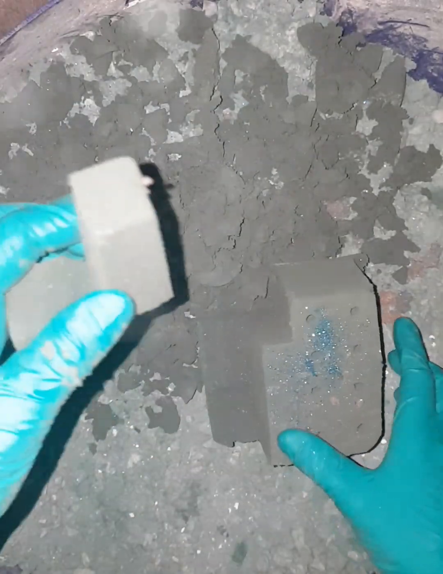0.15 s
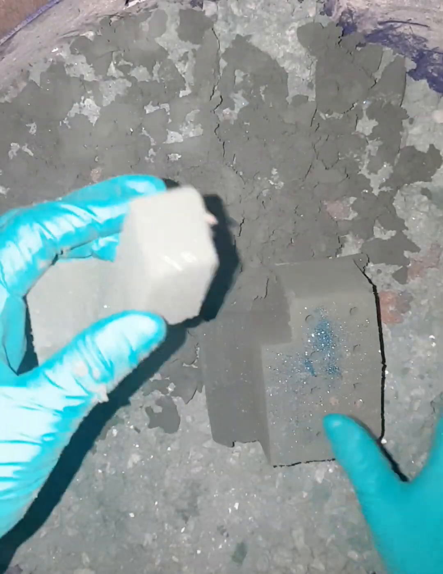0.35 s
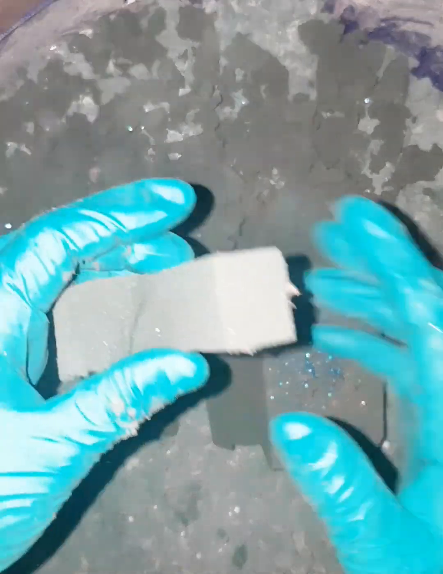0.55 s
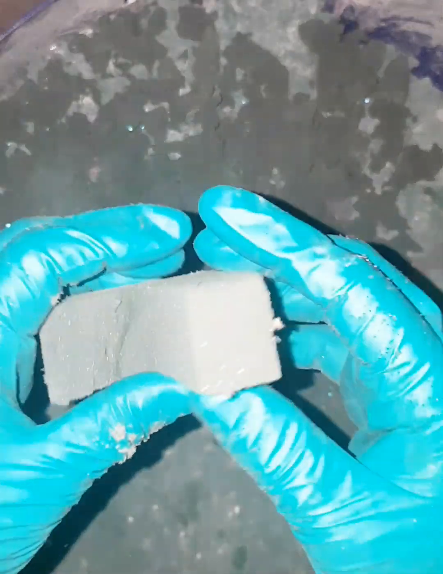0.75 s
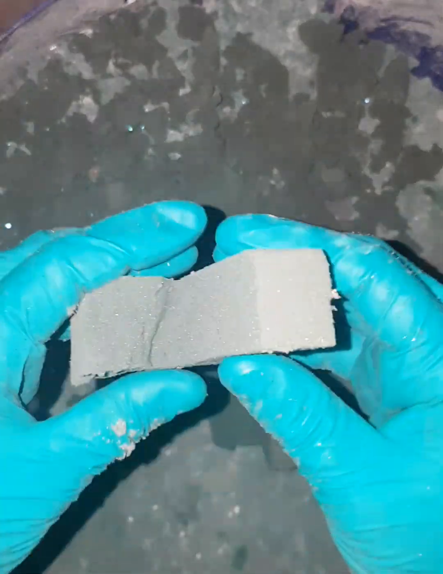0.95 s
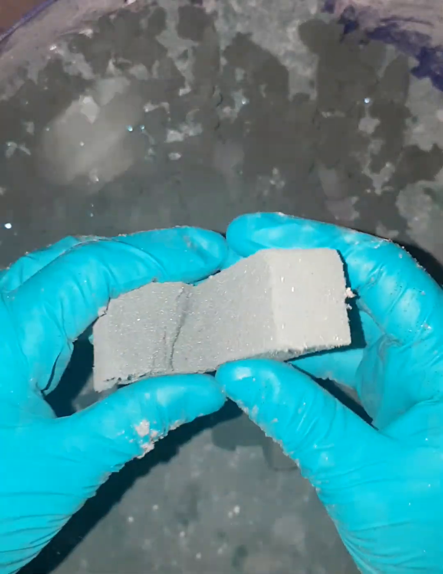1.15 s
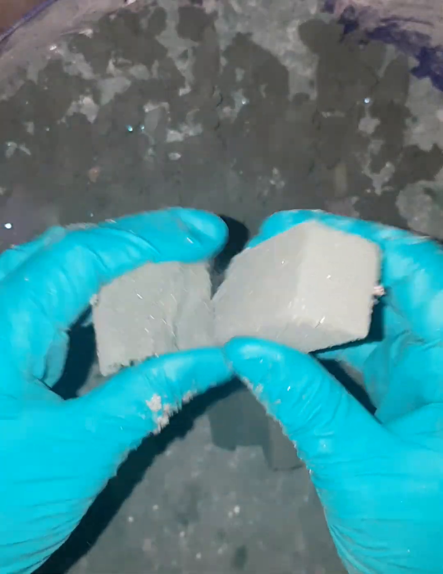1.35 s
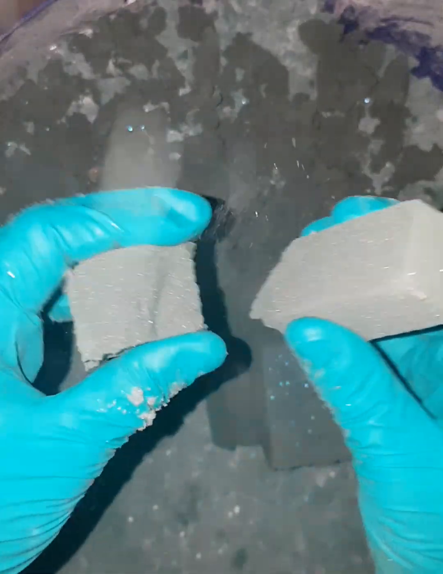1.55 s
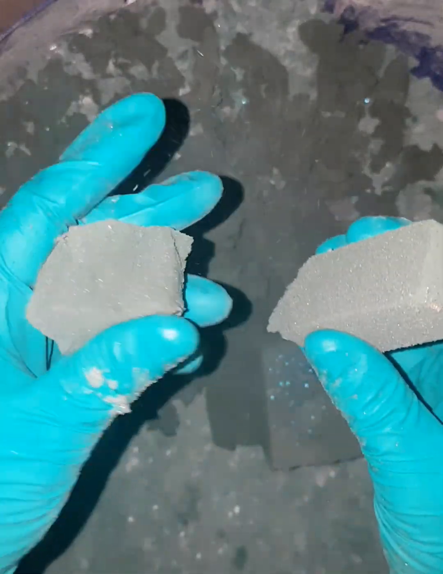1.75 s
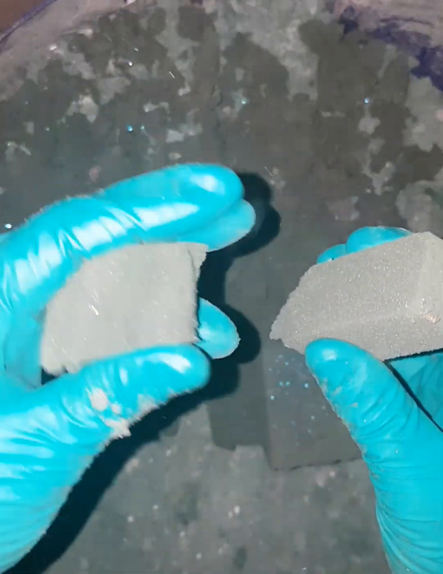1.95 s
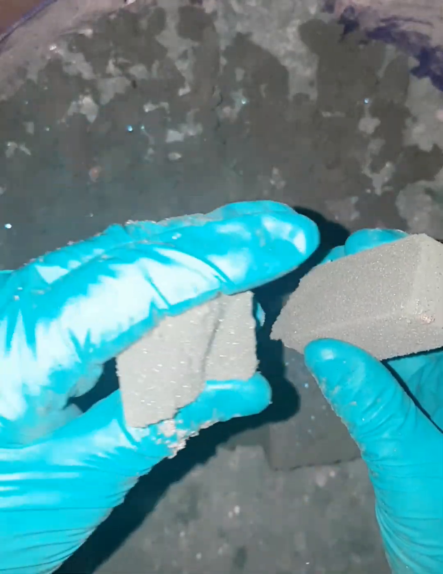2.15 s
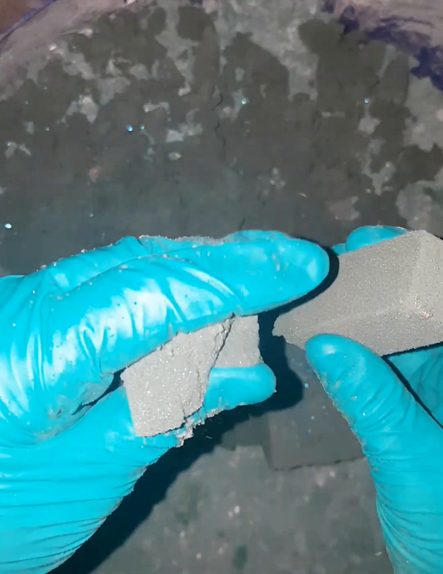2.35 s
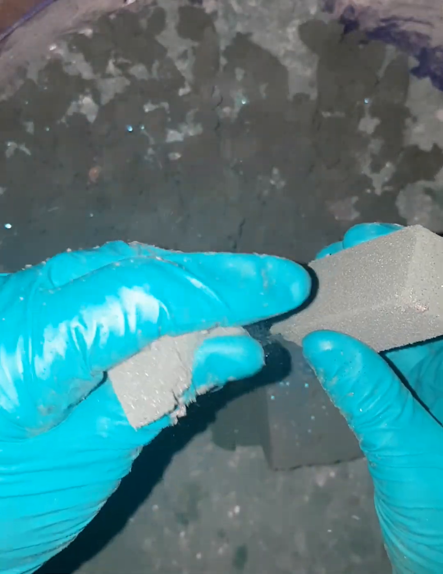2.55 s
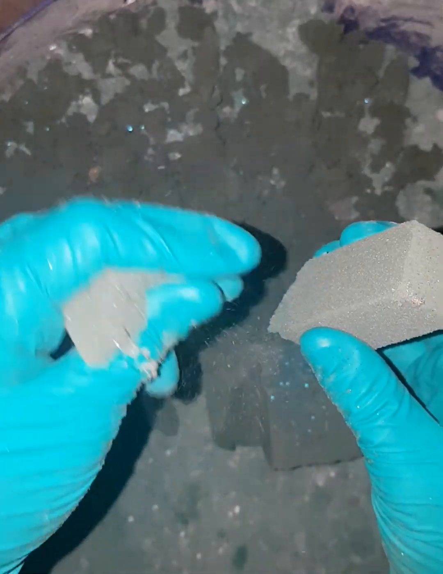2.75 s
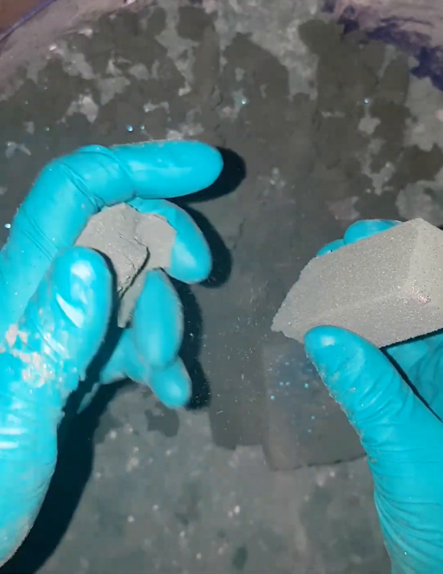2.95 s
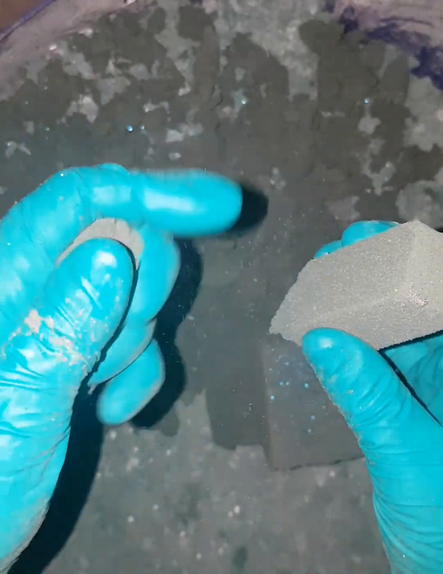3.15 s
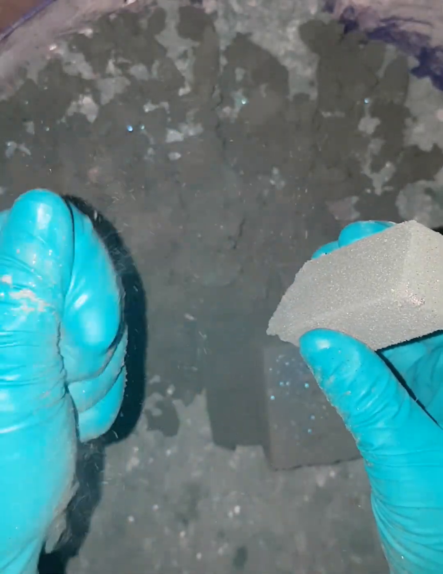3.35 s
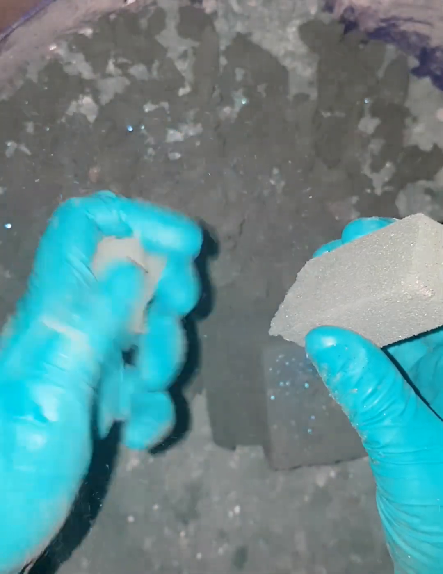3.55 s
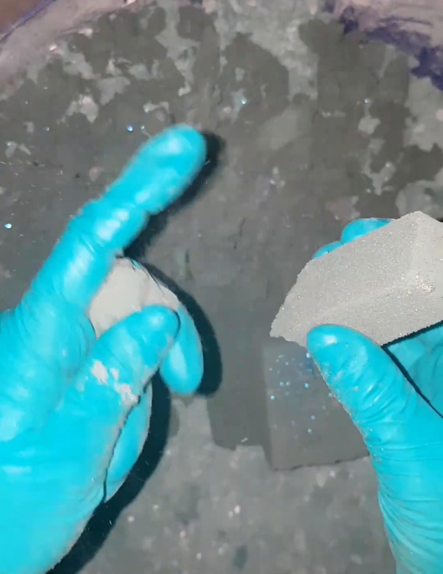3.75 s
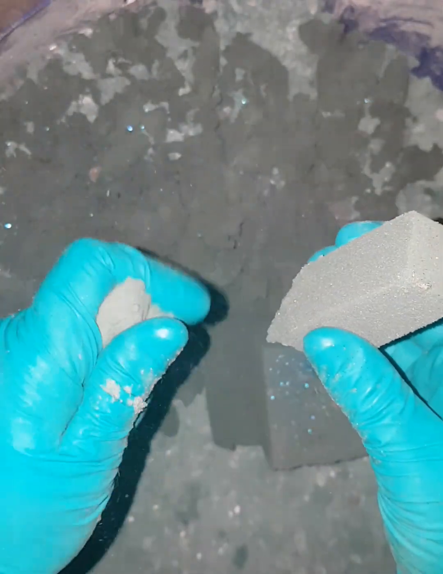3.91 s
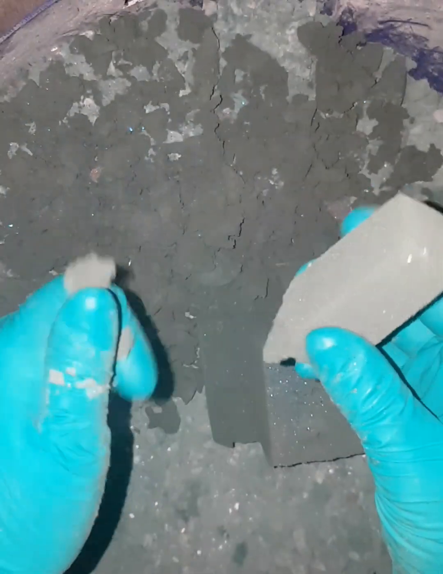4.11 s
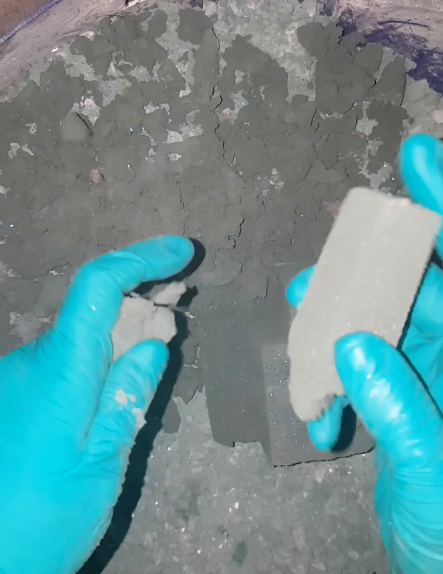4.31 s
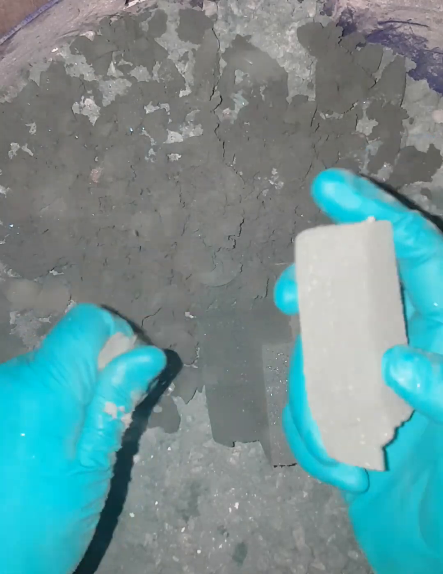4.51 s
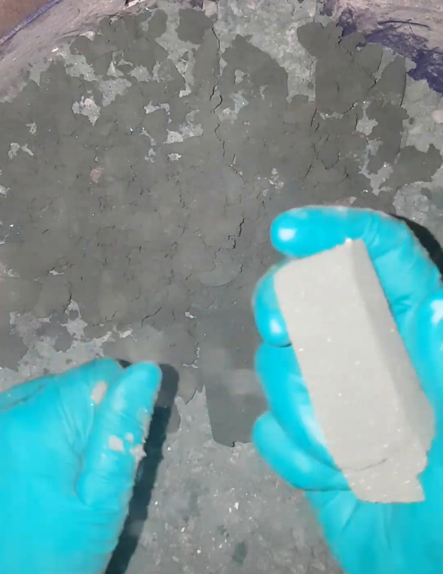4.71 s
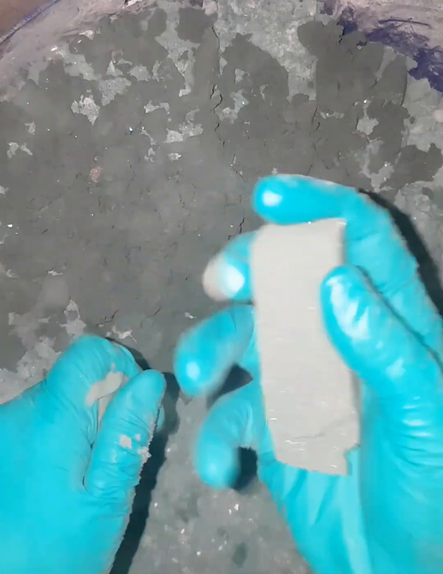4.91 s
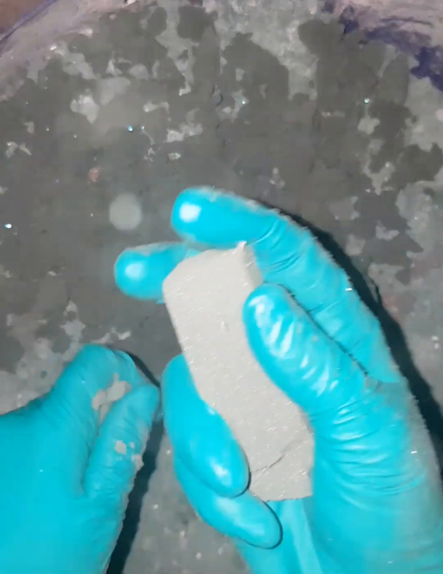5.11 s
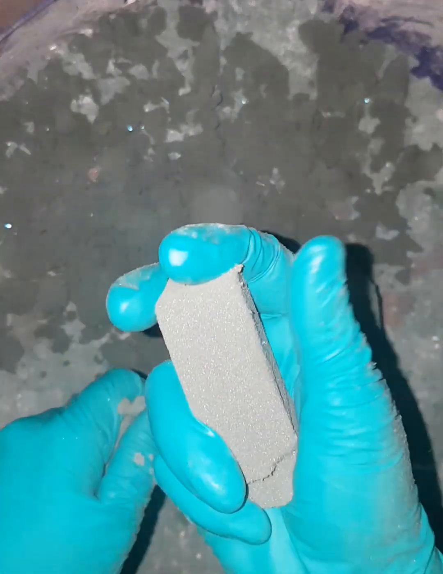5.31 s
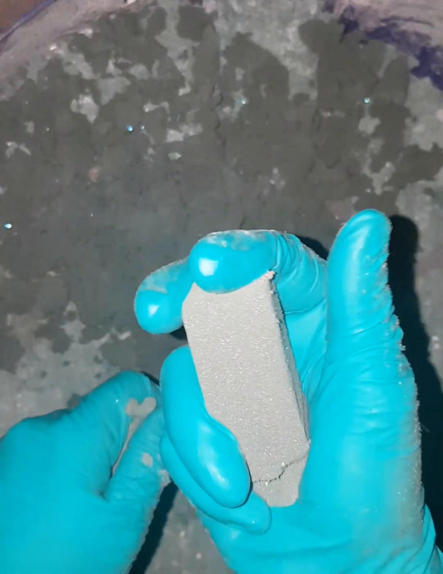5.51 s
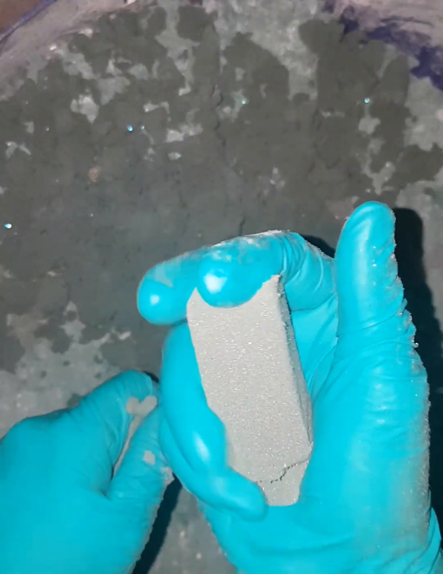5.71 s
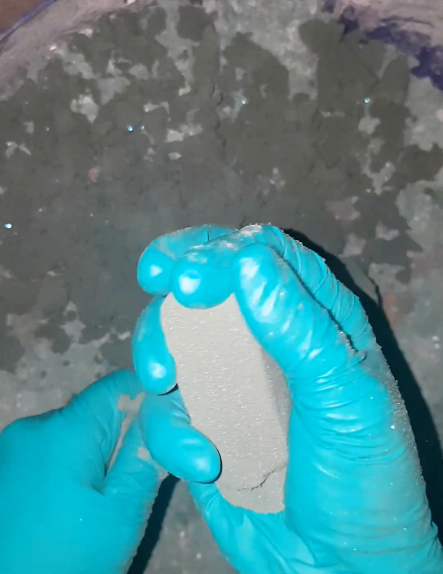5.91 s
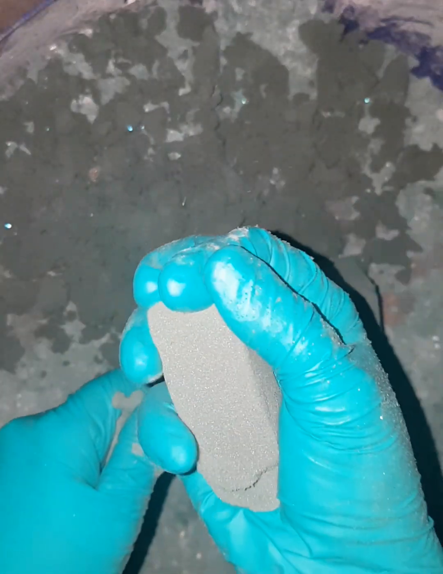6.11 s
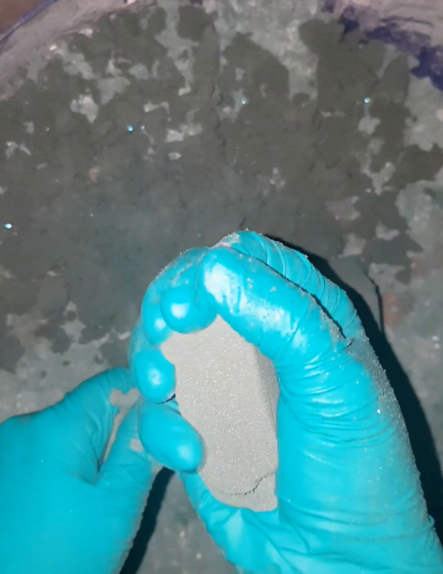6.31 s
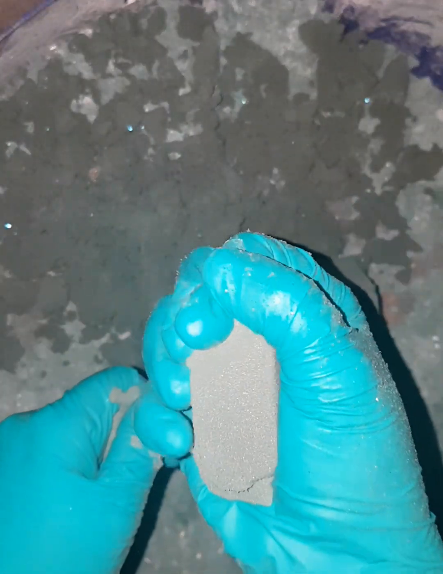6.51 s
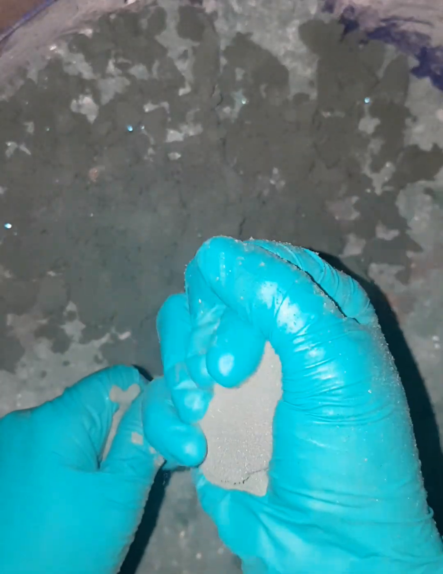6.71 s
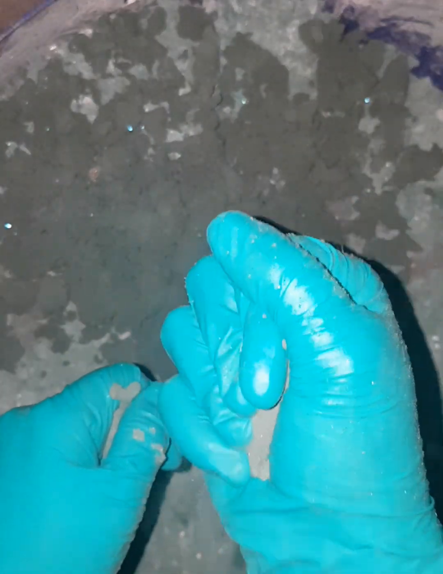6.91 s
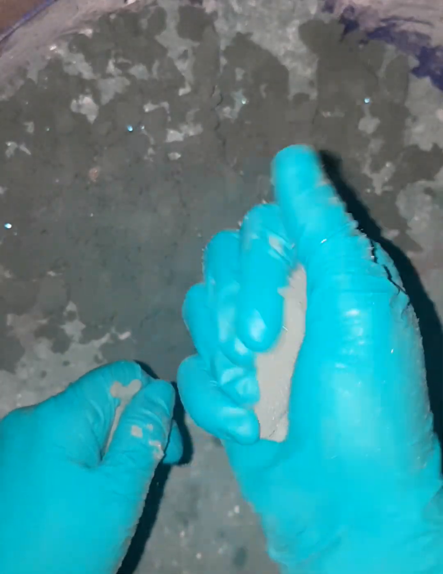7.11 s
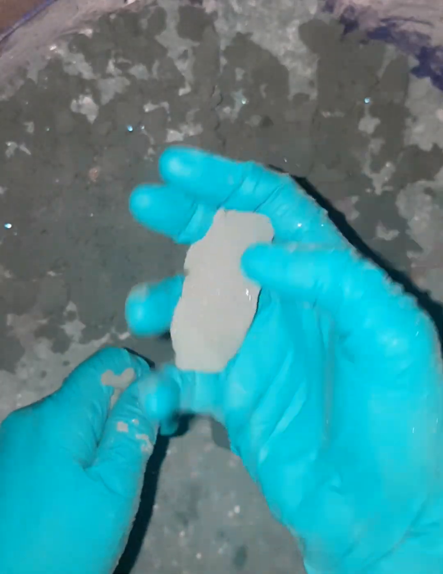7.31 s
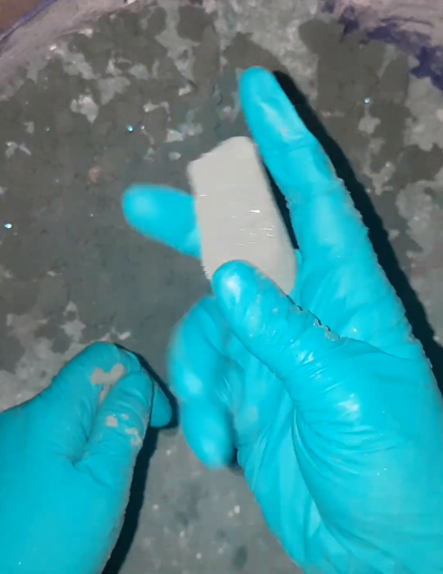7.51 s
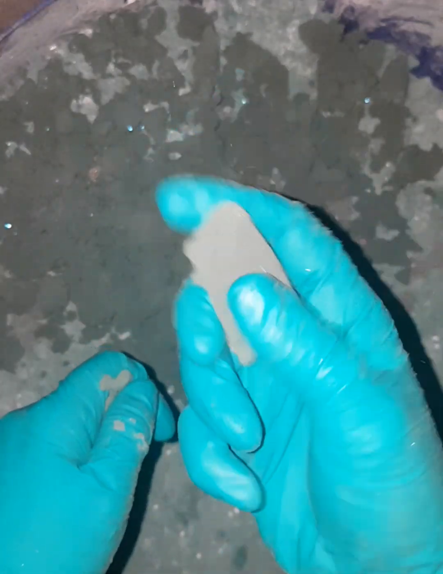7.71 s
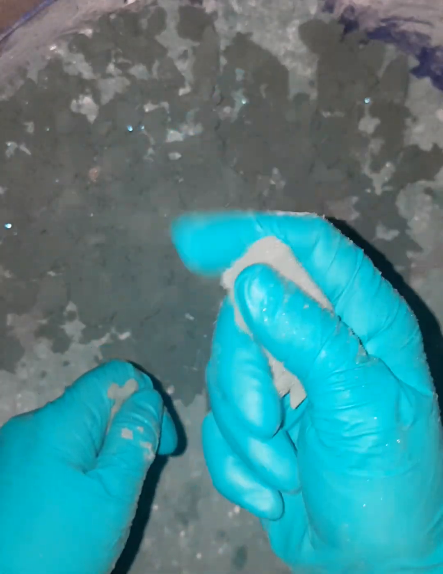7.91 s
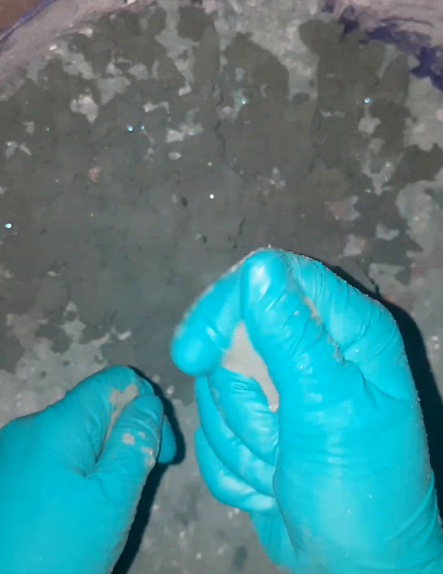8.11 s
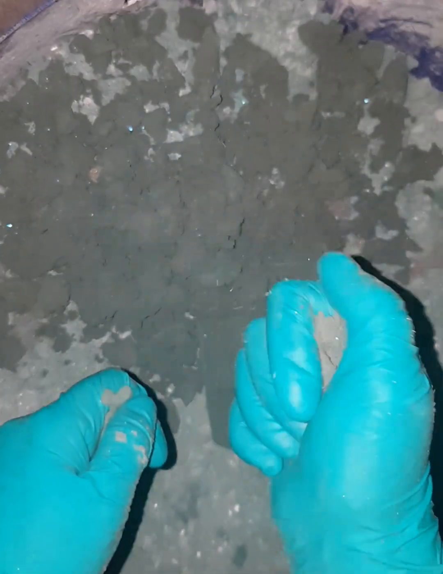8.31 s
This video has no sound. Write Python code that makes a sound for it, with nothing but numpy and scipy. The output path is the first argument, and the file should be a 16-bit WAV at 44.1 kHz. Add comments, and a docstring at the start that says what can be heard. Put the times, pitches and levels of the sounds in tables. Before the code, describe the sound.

Rubber-gloved hands rasp over dry, brittle foam, snap it sharply in two, then crush it in gritty, crackling crunches very close up.

```python
"""Gloved hands work a block of dry floral foam close to a small microphone.
First the gloves stroke and rasp across it; at about 1.35 s, after a slow squeeze, the block breaks in two.
The left hand then crushes its half: brittle cells collapse as a hiss of tiny fractures, walls snap singly.
After 4.15 s the right hand takes over, closing in a hollow fist near 6.6 s before last strokes and squeezes.
A short room tail and a low hush of coloured noise lie underneath throughout."""
import sys
import numpy as np
from scipy import signal
from scipy.fft import rfft, irfft, next_fast_len
from scipy.io import wavfile
from scipy.ndimage import uniform_filter1d, map_coordinates

SR = 44100
rng = np.random.default_rng(int(sys.argv[2]) if len(sys.argv) > 2 else 0)


def transcribe(signal):
    """Save signal, clipped to [-1, 1], as a 16-bit WAV file at the path in sys.argv[1]."""
    frames = np.atleast_2d(signal).T
    limited = np.clip(frames, -1, 1)
    pcm = np.round(limited * 32767).astype(np.int16)
    wavfile.write(sys.argv[1], SR, pcm)


N = 368676

# A glove strokes briefly across the foam as the grip changes. Each row: middle in seconds,
# length in seconds, level in dB, glove drag in dB relative to that level, pitch of the scuff in Hz.
STROKES = [(0.012, 0.15, -62, -5.5, 4530), (0.29, 0.056, -52.5, -9.5, 4800), (0.612, 0.047, -57, -12, 2970),
           (0.67, 0.021, -39, -8, 3200), (0.735, 0.13, -44.5, -9, 2880), (0.839, 0.083, -40.5, -11.5, 3770),
           (0.954, 0.1, -50, -8.5, 2880), (1.018, 0.029, -41.5, -13.5, 4700),
           (1.068, 0.027, -42, -15.5, 3280), (1.131, 0.052, -55, -3, 3040), (1.703, 0.027, -49, -9, 3180),
           (2.902, 0.033, -35, -11, 4480), (3.076, 0.12, -50, -10.5, 3300), (3.183, 0.11, -41, -19, 3300),
           (4.113, 0.039, -48.5, -12, 4045), (4.231, .042, -42.5, -17, 4420), (4.33, .08, -45, -11, 5490),
           (4.665, 0.045, -32.5, -10.5, 4310), (4.819, 0.033, -37.5, -6.5, 4480),
           (4.9, 0.024, -30.5, -20.5, 4260), (5.341, 0.051, -44.5, -16, 3630),
           (5.893, 0.021, -47.5, -7, 4800), (7.155, 0.11, -49.5, -8.5, 3730),
           (7.273, 0.2, -60.5, -15.5, 3080), (7.384, 0.067, -50, -13.5, 3480),
           (7.474, 0.025, -51.5, -11, 3020), (7.529, 0.035, -44.5, -8.5, 3490),
           (7.567, 0.096, -47, -14, 3720), (7.685, 0.11, -44.5, -9, 2840), (7.766, .05, -41, -7.5, 3380),
           (7.858, 0.1, -45, -15.5, 2960), (7.948, .08, -38, -12, 3390)]
# Spectrum of the collapsing cells. Each row: frequency in Hz, density in dB per Hz.
CELL_SPECTRUM = [(200, -49), (900, -18.5), (1800, -13.5), (2400, -10), (3100, 0.5), (5000, 0.5),
                 (6600, 0.5), (8000, -11), (11000, -26), (16000, -26)]
# Colour of a snapping wall. Each row: frequency in Hz, gain in dB.
WALL_COLOUR = [(300, -3), (850, -6), (1480, 4), (2500, -0.5), (6500, 2), (9000, -6), (16000, -21)]

STROKE_SHAPE = 1.73  # exponent of the swell: 1 = pointed, 2 = rounded


def amp(db):
    """Decibels to gain."""
    return 10 ** (np.asarray(db) / 20)


def unit(x):
    """Scale to rms 1."""
    return x / np.sqrt(np.mean(x ** 2) + 1e-20)


def along(points, hz):
    """(Hz, value) points read on a log frequency axis."""
    f, v = np.transpose(points)
    return np.interp(np.log(hz + 1), np.log(f), v)


def curve(rows):
    """(seconds, value) rows as one value per sample."""
    return np.interp(np.arange(N) / SR, *np.transpose(rows))


def wobble(rate):
    """A smooth random curve with rate knots a second."""
    knots = rng.standard_normal(int(N * rate / SR) + 4)
    return map_coordinates(knots, [np.arange(N) * rate / SR])


def add(track, s, sound):
    """Mix a sound into the track at s seconds."""
    part = track[max(round(s * SR), 0):][:len(sound)]
    part += sound[:len(part)]


def coloured(x, gain_db):
    """Causal minimum-phase filter with the given dB as a function of Hz."""
    m = 2 * next_fast_len(len(x) // 2 + 2048)
    cepstrum = irfft(np.log(amp(gain_db(np.fft.rfftfreq(m, 1 / SR)))))
    # folding the cepstrum forward in time makes the filter causal
    cepstrum[1:m // 2] *= 2
    cepstrum[m // 2 + 1:] = 0
    return irfft(rfft(x, m) * np.exp(rfft(cepstrum)))[:len(x)]


def shaped(x, spectrum):
    """x filtered by the given spectrum, at rms 1."""
    return unit(coloured(x, lambda hz: along(spectrum, hz)))


def resonance(x, hz, q):
    """One band-pass resonance."""
    b, a = signal.iirpeak(min(hz, SR / 4), max(q, .7), SR)
    return signal.lfilter(b, a, x)


def double_resonance(x, hz, q):
    """The same resonance twice in a row, for steeper skirts."""
    return resonance(resonance(x, hz, q), hz, q)


def grains(rate, scatter_db):
    """Randomly timed micro-fractures of random size and sign, rate of them a second, at rms 1."""
    hit = rng.random(N) < rate / SR
    sign = rng.choice([-1, 1], N)
    size = amp(scatter_db * np.clip(rng.standard_normal(N), -2, 2))
    return unit(hit * sign * size)


def swells(peak_s, build, release, db, shape):
    """Summed power of gestures that swell to a peak and ease off, 10 dB in the build and release times."""
    s = np.arange(0, N, 32)[:, None] / SR
    away = np.abs(np.maximum((peak_s - s) / build, (s - peak_s) / release))
    power = np.sum(amp(db - 10 * away ** shape) ** 2, axis=1)
    return curve(np.column_stack([s, power]))


def effort():
    """Powers of squeezes, strokes and holding add up to crush level, powder share and glove drag, in dB."""
    # The fingers squeeze the foam. Each row: hardest moment in seconds, build and release in seconds
    # per 10 dB, crush level in dB, fine powder and glove drag in dB relative to the crush.
    squeezes = [(1.12, 0.35, 0.24, -51, -11.5, -20), (1.349, 0.028, 0.023, -33.5, -6, -39),
                (1.645, .085, 0.028, -48.5, -7, -12.5), (1.91, 0.12, 0.14, -48.5, -8, -18),
                (2.345, 0.11, 0.058, -35.5, -8.5, -30), (2.54, 0.17, 0.059, -42, -0.5, -23),
                (2.83, 0.04, 0.1, -45.5, -8, -11), (3.208, 0.05, 0.088, -40.5, -6, -15.5),
                (3.52, 0.37, 0.35, -55, -9.5, -9.5), (3.85, 0.18, .15, -52, -8.5, -15),
                (4.0, .06, 0.11, -43, -8, -20), (4.44, 0.27, 0.33, -50, -5.5, -11.5),
                (4.97, 0.11, 0.068, -38.5, -12, -10.5), (5.17, 0.056, 0.12, -40.5, -12, -11),
                (5.45, 0.15, 0.4, -46, -9, -12), (5.635, 0.046, 0.058, -37, -8, -7.5),
                (5.752, 0.055, 0.027, -31, -13.5, -11.5), (6.06, 0.19, 0.14, -45.5, -9.5, -12),
                (6.28, 0.09, 0.06, -36.5, -12, -11), (6.45, 0.2, 0.095, -39, -10, -9),
                (6.62, 0.11, 0.071, -33, -10.5, -17), (6.75, 0.11, 0.091, -35, -5, -12.5),
                (6.843, .09, 0.032, -29.5, -8.5, -19), (8.045, 0.061, 0.14, -44, -8, -18),
                (8.235, .08, 0.068, -44.5, -9, -21)]
    squeeze_shape = 1.09
    s, build, release, db, powder, drag = np.transpose(squeezes)
    levels = db, db + powder, db + drag
    squeezing = [swells(s, build, release, level, squeeze_shape) for level in levels]

    s, length, db, drag, hz = np.transpose(STROKES)
    # a higher-pitched stroke scrapes off more cells and powder: 1 dB per octave above 3460 Hz
    grit = 1 * np.log2(hz / 3460)
    parts = -3 + grit, -13 + grit, drag  # crush, powder, drag: dB relative to the stroke
    stroking = [swells(s, length / 2, length / 2, db + part, STROKE_SHAPE) for part in parts]

    # merely holding the foam: crush, powder, drag in dB
    holding = amp([[-71.5], [-84], [-75]]) ** 2
    level_db, fine_db, drag_db = 10 * np.log10(holding + squeezing + stroking)
    return level_db, fine_db - level_db, drag_db


def shifting(x, patchy_db):
    """Small avalanches differ in colour: random patches of gain in time and pitch."""
    z = signal.stft(x, nperseg=256)[2]
    across_pitch = uniform_filter1d(rng.standard_normal(z.shape), size=5, axis=0)
    patches = uniform_filter1d(across_pitch, size=10, axis=1)
    return unit(signal.istft(z * amp(patchy_db * unit(patches)), nperseg=256)[1][:N])


def crush(level_db, powder_db):
    """Cells collapse faster the harder they are pressed; powder adds treble, coarse cells a duller scrape."""
    # Spectrum of the fine powder. Each row: frequency in Hz, density in dB per Hz.
    dust_spectrum = [(3000, -40.5), (6500, 2.5), (7800, 1.5), (10000, -5.5), (11500, -12), (16000, -16.5)]
    rate = 12000 * amp(.25 * (level_db - level_db.max()))  # collapses per second
    # uneven pressure, in little avalanches
    level = amp(level_db + 1.27 * wobble(70) + 1.7 * wobble(450))
    # dividing by the root of the rate leaves the loudness to the level
    collapses = grains(rate, scatter_db=2.0) / np.sqrt(rate)
    cells = shifting(shaped(collapses, CELL_SPECTRUM), patchy_db=1.83)
    dust = shaped(grains(12000, scatter_db=1.0), dust_spectrum)
    coarse = unit(double_resonance(grains(5000, scatter_db=1.5), hz=3070, q=2.0))
    # the less powder, the more coarse scrape
    coarse_gain = amp(-22 - powder_db + 1.4 * wobble(22))
    return level * (amp(-1.0) * cells + amp(powder_db + 2.0) * dust + coarse_gain * coarse)


def crackle(level_db, crackle_db=-11):
    """Here and there one larger cell breaks and stands out of the hiss."""
    return amp(level_db + crackle_db) * shaped(grains(260, scatter_db=4.0), CELL_SPECTRUM)


def snap(hz):
    """A wall gives way at once, sprays a few splinters and echoes inside the block; peak 1."""
    t = np.arange(SR // 50) / SR
    force = 0.04 * rng.standard_normal(len(t)) * amp(-60 * t / 0.014)
    force[0] += 1
    sound = resonance(resonance(force, hz, q=1.11), hz, q=0.7)
    # the snap returns inverted from the far face of the block after 0.53 ms
    sound = sound - 0.45 * np.interp(t - 0.00053, t, sound, left=0)
    return sound / np.abs(sound).max()


def snaps():
    """Single walls of foam snap, each at its own pitch."""
    # Each row: start in seconds, peak in dB ahead of the wall's colour, pitch in Hz.
    single_snaps = [(1.3378, -14, 3320), (1.3522, 4, 5800), (1.3535, -2.5, 4930), (1.37, -14, 3500),
                    (2.167, -29, 4200), (2.176, -27, 4200), (2.2342, -21, 3930), (2.248, -9, 6300),
                    (2.2502, -15, 4870), (2.3058, -13, 5460), (2.3745, -18, 6030), (2.4434, -16, 4800),
                    (2.465, -15, 3530), (3.2184, -19, 5000), (5.6385, -9, 3000), (5.7827, -7, 3700),
                    (5.9344, -3, 3120), (6.235, -17.5, 3800), (6.2597, -5.5, 3600), (6.268, -17.5, 4500),
                    (6.4715, -20, 4520), (6.5027, -17, 4070), (6.566, 0.5, 2460), (6.5668, 0, 5960),
                    (6.5897, 0, 3960), (6.5932, -10, 4470), (6.606, -1.5, 4660), (6.6407, 6, 2780),
                    (6.649, -12.5, 5130), (6.676, -10, 5960), (6.753, -19.5, 5500), (6.806, -12, 4500),
                    (7.1185, -36.5, 2390)]
    out = np.zeros(N)
    for s, db, hz in single_snaps:
        add(out, s, amp(db) * snap(hz))
    return coloured(out, lambda hz: along(WALL_COLOUR, hz))


def crumbling():
    """Showers of smaller cracks, each with its own size and pitch."""
    # Each row: start in seconds, end in seconds, cracks per second,
    # middle of the range of peaks in dB ahead of the wall's colour.
    showers = [(0.673, 0.87, 50, -30), (2.29, 2.399, 150, -28.5), (2.441, 2.592, 110, -34.5),
               (5.947, 6.211, 35, -29.5), (6.272, 6.702, 115, -27.5), (6.71, 6.864, 230, -20)]
    out = np.zeros(N)
    for start, end, rate, db in showers:
        count = int((end - start) * rate)
        for when, size, pitch in rng.random((count, 3)):
            crack = amp(db + 12 * (size - .5)) * snap(3500 * 2 ** pitch)
            add(out, start + when * (end - start), crack)
    return coloured(out, lambda hz: along(WALL_COLOUR, hz))


def block_break(tear_db=-14.5, tear_length=0.017, ring_db=-36):
    """A crack tears raggedly through the block and leaves a short, rough ring."""
    # What rings after the break. Each row: frequency in Hz, level in dB relative to ring_db, t60 in seconds.
    ring_modes = [(1840, -4, 0.24), (2060, 4.5, 0.15), (4320, 5.5, 0.13)]
    # Spectrum of the tear. Each row: frequency in Hz, density in dB per Hz.
    tear_spectrum = [(50, -26), (150, -22), (400, -27), (1300, -23), (1800, 4), (2300, -9), (3000, 1.5),
                     (6400, 3), (8000, -8.5), (16000, -51.5)]
    t = np.arange(SR // 3) / SR
    fractures = shaped(grains(4000, scatter_db=0.0)[:len(t)], tear_spectrum)
    tear = amp(tear_db) * np.exp(-(t / tear_length) ** 2) * fractures
    ring = np.zeros(len(t))
    for hz, db, t60 in ring_modes:
        rough_tone = unit(resonance(rng.standard_normal(len(t)), hz, q=11))
        ring += amp(ring_db + db - 60 * t / t60) * rough_tone
    out = np.zeros(N)
    add(out, 1.3515, tear + ring)  # the moment the block breaks, in seconds
    return out


def fist(x):
    """Inside the closed right hand the crunch gains a broad, hollow body."""
    # One row: start and end of the closed hand in seconds.
    closed = (6.55, 6.9)
    t = np.arange(N) / SR
    enclosed = x * (t > closed[0]) * (t < closed[1])
    return amp(16.5) * resonance(resonance(enclosed, hz=503, q=1.7), hz=680, q=1.35)


def gloves(level_db, drag_db):
    """Rubber drags over the gritty surface; the hands rustle dully, more so as they press or shift."""
    # Spectra of the glove drag and of the hand rustle. Each row: frequency in Hz, density in dB per Hz.
    glove_spectrum = [(150, -25), (500, -12.5), (850, -5.5), (1380, 2.8), (1850, -0.5), (2600, -3),
                      (5000, -29), (12000, -57)]
    hand_spectrum = [(30, -28.5), (100, 1), (170, -2), (330, 1), (600, -4.5), (1200, -10.5), (4000, -63.5)]
    # The hands shift their hold. Each row: middle in seconds, length in seconds, level in dB.
    hold_shifts = [(0.688, 0.068, -55.5), (0.805, 0.25, -60), (3.27, 0.29, -64.5), (4.307, 0.32, -61),
                   (4.657, 0.094, -56.5), (4.94, 0.27, -60), (6.83, 0.18, -51), (7.775, 0.048, -55.5)]
    drag = amp(drag_db + 2.1 * wobble(120)) * shaped(grains(3000, scatter_db=5.0), glove_spectrum)
    s, length, db = np.transpose(hold_shifts)
    # -65 dB at the hardest squeeze, falling 0.34 dB per dB of crush
    pressing = amp(-65 + 0.34 * (level_db - level_db.max()))
    rustle = np.sqrt(pressing ** 2 + swells(s, length / 2, length / 2, db, STROKE_SHAPE))
    return drag + rustle * shaped(grains(1200, scatter_db=-1), hand_spectrum)


def scuffs():
    """Each stroke scrapes with a broad resonance of its own."""
    out = np.zeros(N)
    t = np.arange(-SR // 5, SR // 5) / SR
    for s, length, db, _, hz in STROKES:
        slips = rng.standard_normal(len(t)) * (rng.random(len(t)) < 6000 / SR)
        scuff = unit(double_resonance(slips, hz, q=2.3))
        # 5.5 dB under the stroke's level, and 10 dB further down at its ends
        scuff *= amp(db - 5.5 - 10 * np.abs(2 * t / length) ** STROKE_SHAPE)
        add(out, s + t[0], scuff[s + t >= 0])
    return out


def rasps():
    """A glove sticks and slips in short slides whose uneven slips crowd around one pitch."""
    # Each row: centre in seconds, half length in seconds, level in dB, pitch in Hz.
    slides = [(0.744, 0.062, -50.5, 2780), (0.84, 0.025, -44, 2930), (2.908, 0.0047, -35, 3500),
              (4.361, 0.16, -49, 4550), (4.665, 0.016, -44, 4340), (4.898, 0.0098, -34.5, 4050),
              (7.395, 0.013, -50, 2780)]
    out = np.zeros(N)
    t = np.arange(-SR // 5, SR // 5) / SR
    for s, length, db, hz in slides:
        slips = rng.standard_normal(len(t)) * (rng.random(len(t)) < 2500 / SR)
        rasp = unit(double_resonance(slips, hz, q=5.7))
        add(out, s + t[0], amp(db) * np.exp(-(t / length) ** 4) * rasp)
    return out


def low_thumps():
    """Low sine bursts that each swell and die within a few cycles."""
    # Low thumps: a few dull knocks, and the bass that the overloaded input adds under the loudest snaps.
    # Each row: start in seconds, level in dB, pitch in Hz.
    thumps = [(0.867, -45.5, 216), (1.35, -40, 150), (6.566, -31, 420), (6.64, -52, 85), (7.507, -48, 128),
              (7.518, -48, 172)]
    out = np.zeros(N)
    for s, db, hz in thumps:
        cycles = np.arange(SR // 10) / SR * hz
        swell = 2 * cycles * np.exp(1 - 2 * cycles)
        add(out, s, amp(db) * swell * np.sin(2 * np.pi * cycles))
    return out


def placed(x):
    """The sound moves from the left hand to the right, and its colour differs with the place."""
    # Colour at each hand. Each row: frequency in Hz, gain in dB.
    left_colour = [(900, 1), (1300, -2), (1700, 0.5), (10500, 0), (14000, -2.5)]
    right_colour = [(10500, 0), (12500, 2.5)]
    right = np.arange(N) / SR > 4.15  # handover in seconds
    at_left = coloured(x * ~right, lambda hz: along(left_colour, hz))
    at_right = coloured(x * right, lambda hz: along(right_colour, hz))
    return at_left + at_right


def room(x):
    """A short diffuse tail of decaying noise that dies soonest in the treble."""
    # Each row: frequency in Hz, t60 in seconds.
    decay_times = [(200, 0.28), (4000, 0.2), (14000, 0.087)]
    hz, t, z = signal.stft(rng.standard_normal(SR // 3), SR, nperseg=256)
    decay = amp(-60 * t / along(decay_times, hz)[:, None])
    tail = signal.istft(z * decay, SR, nperseg=256)[1]
    return signal.fftconvolve(x, tail / np.linalg.norm(tail))[:N]


def room_hush():
    """The quiet room's low hush: steady noise, strongest in the bass."""
    # Each row: frequency in Hz, density in dB per Hz.
    hush_spectrum = [(20, -1), (50, 3), (130, 5.5), (300, 1), (800, -6), (2500, -12), (6500, -20.5)]
    return amp(-65.0) * shaped(rng.standard_normal(N), hush_spectrum)


def scene():
    """Foam and gloves close by, over the room's faint answer and low hush."""
    level_db, powder_db, drag_db = effort()
    crunch = crush(level_db, powder_db) + crackle(level_db) + crumbling()
    breaking = crunch + fist(crunch) + snaps() + block_break()
    handling = gloves(level_db, drag_db) + scuffs() + rasps()
    foam = placed(breaking + handling + low_thumps())
    return (foam + amp(-22.0) * room(foam) + room_hush())[None]


def record(dry):
    """The microphone port colours the sound, its input saturates on loud peaks, and the band ends steeply."""
    # Resonances and nulls of the microphone port. Each row: centre in Hz, width in Hz, gain in dB.
    port_modes = [(2026, 73, -8), (2686, 180, 3), (5460, 250, -3), (6070, 270, 2.5), (7264, 135, -10),
                  (8750, 406, -7), (9820, 360, 6)]
    top_hz, clip_top = 16000, 0.9  # end of the band; full-scale fraction where the input saturates

    def port_db(f):
        return sum(db * np.exp(-((f - hz) / width) ** 2 / 2) for hz, width, db in port_modes)

    x = coloured(dry[0], port_db)
    x = x / (1 + np.abs(x / clip_top) ** 4) ** (1 / 4)
    in_band = np.fft.rfftfreq(N, 1 / SR) < top_hz
    return irfft(rfft(x) * in_band, N)[None]


dry = scene()
out = record(dry)
transcribe(out)
```